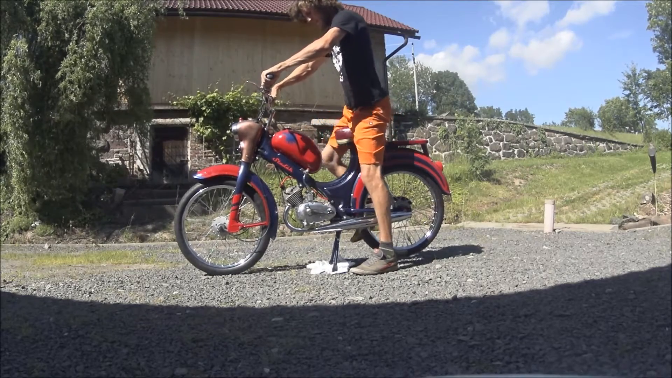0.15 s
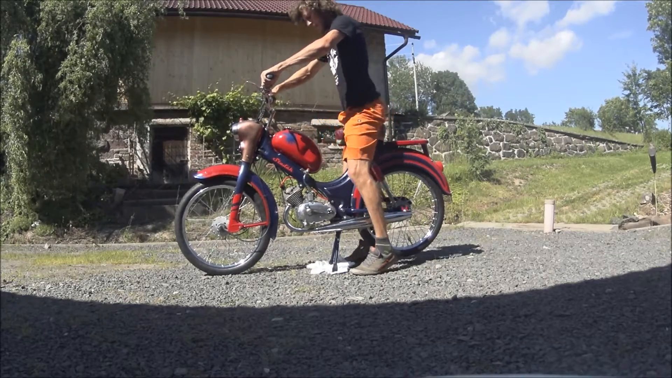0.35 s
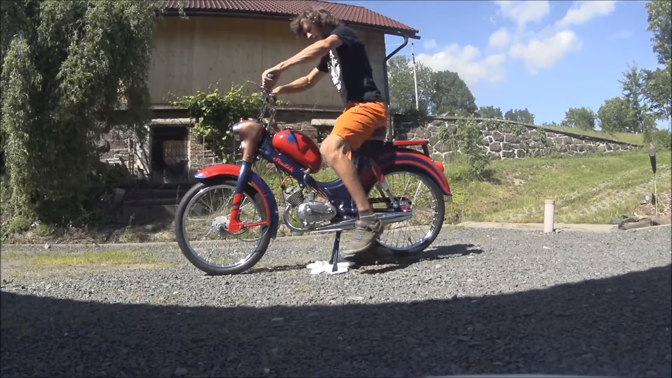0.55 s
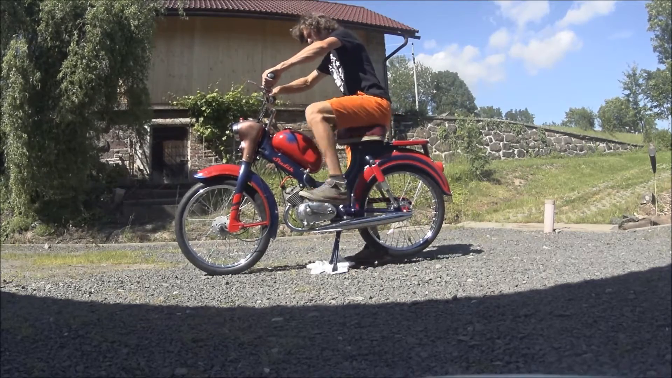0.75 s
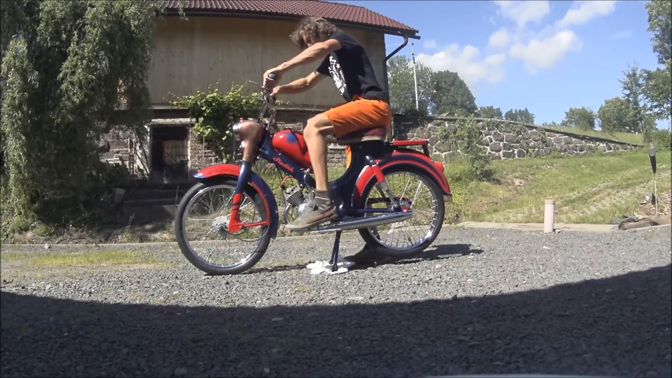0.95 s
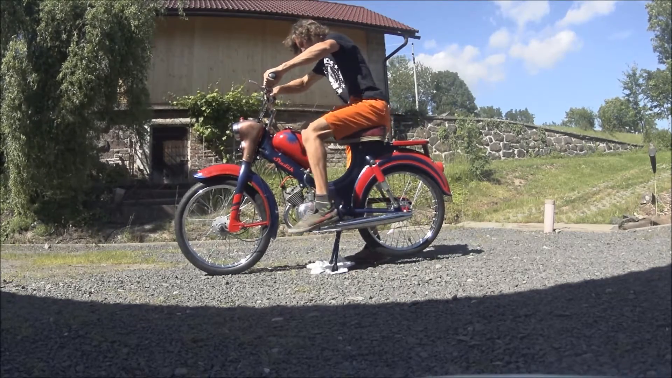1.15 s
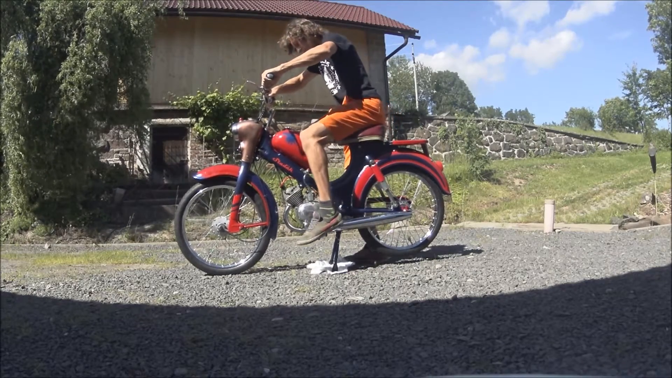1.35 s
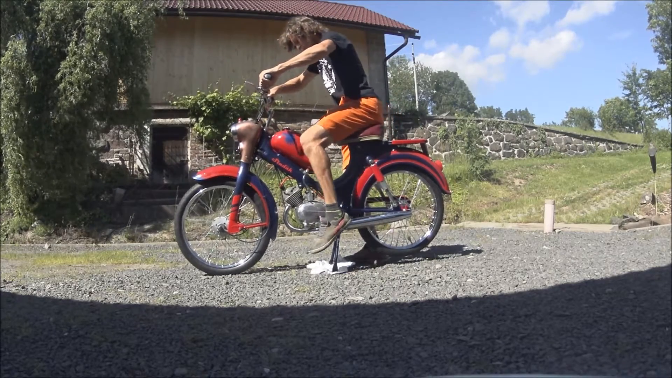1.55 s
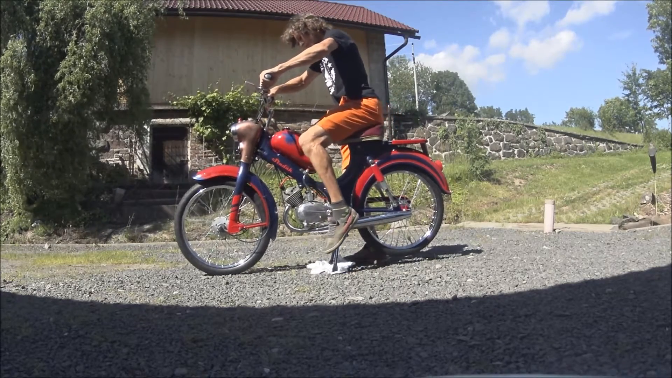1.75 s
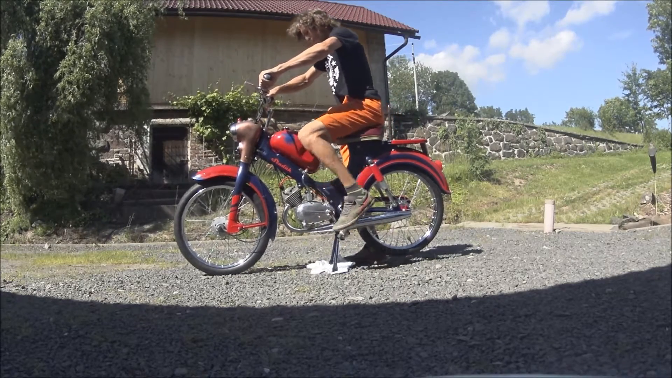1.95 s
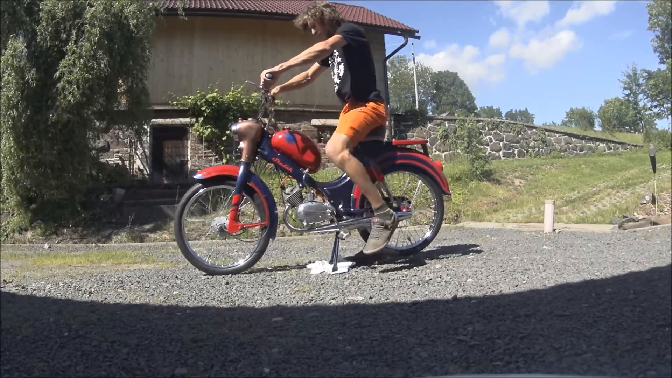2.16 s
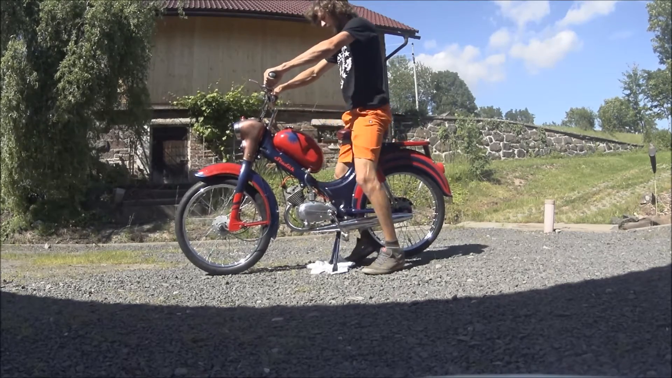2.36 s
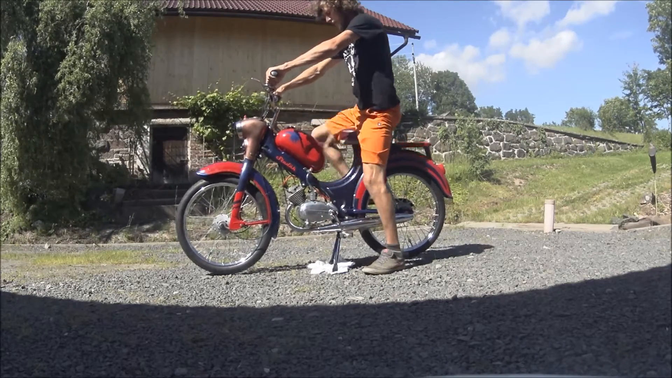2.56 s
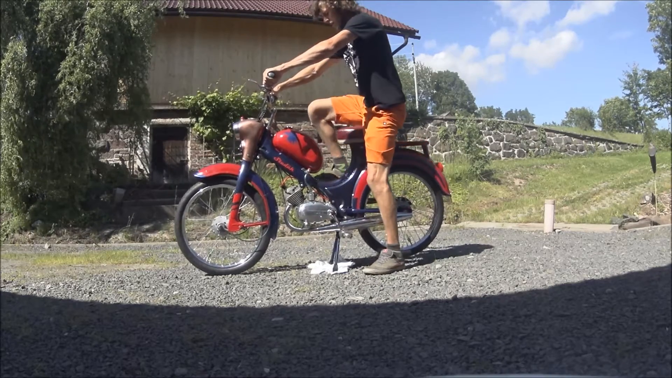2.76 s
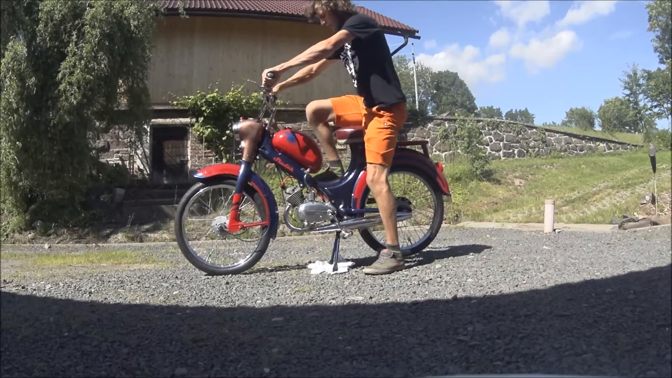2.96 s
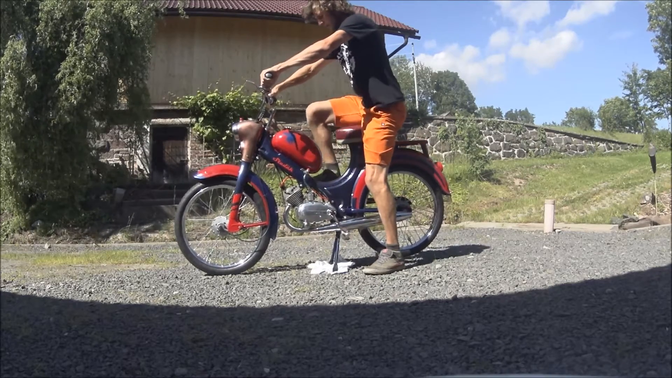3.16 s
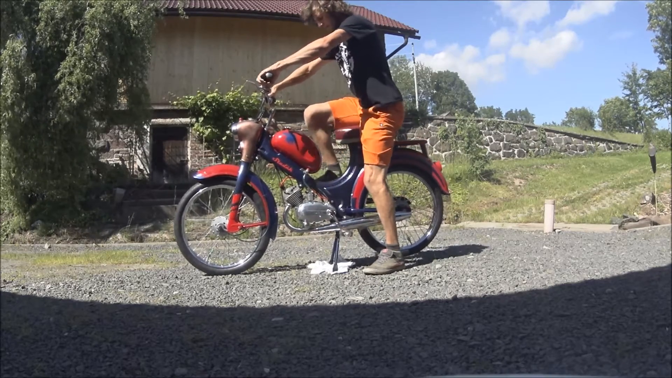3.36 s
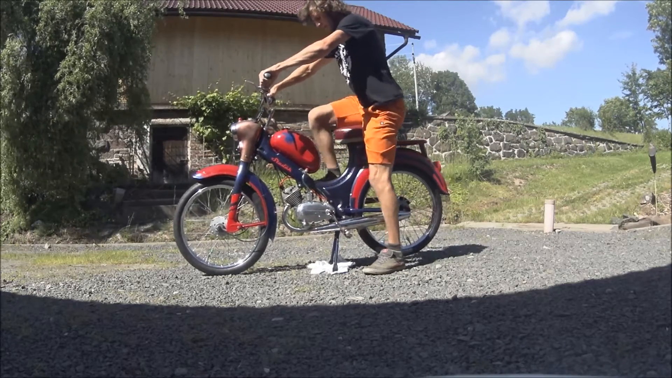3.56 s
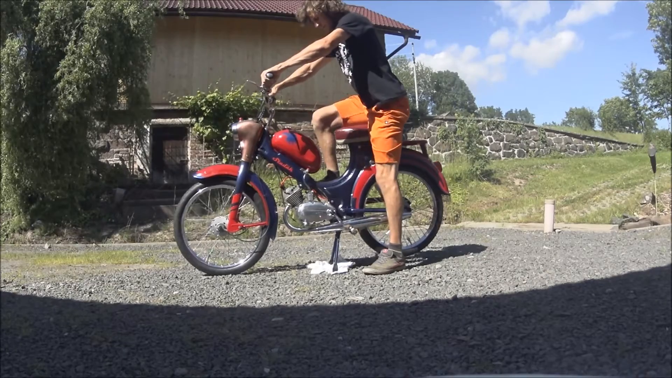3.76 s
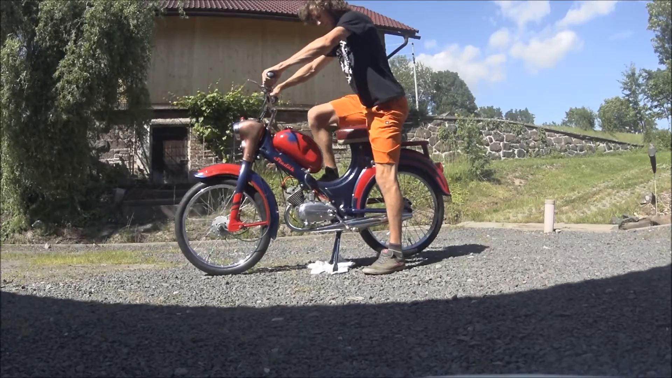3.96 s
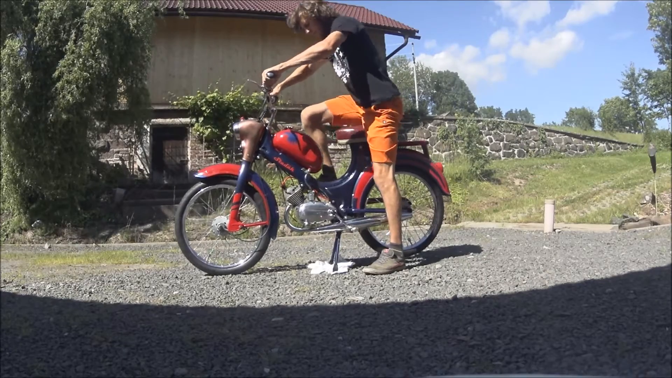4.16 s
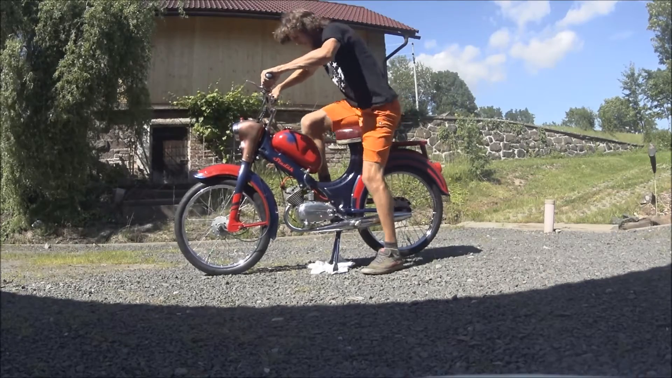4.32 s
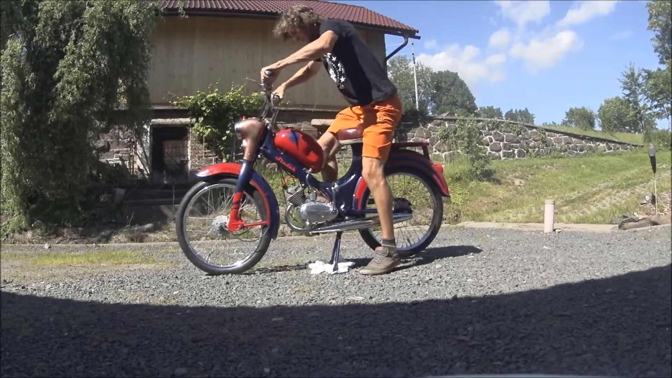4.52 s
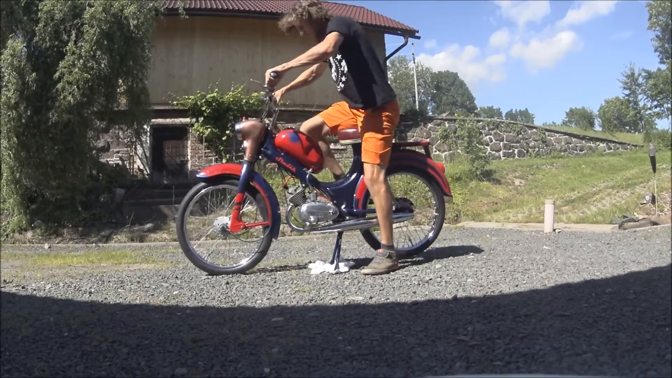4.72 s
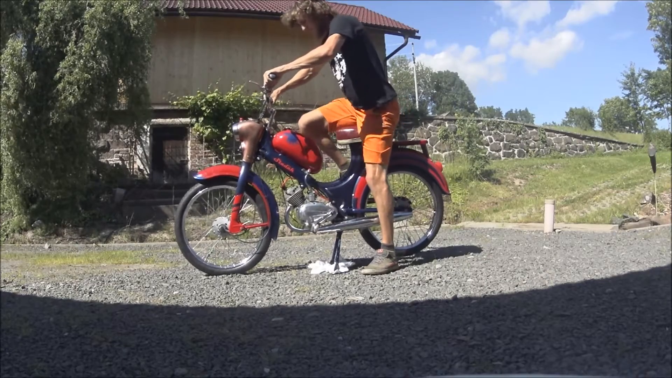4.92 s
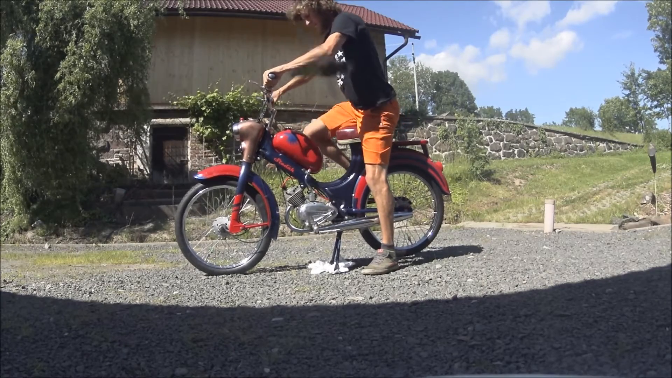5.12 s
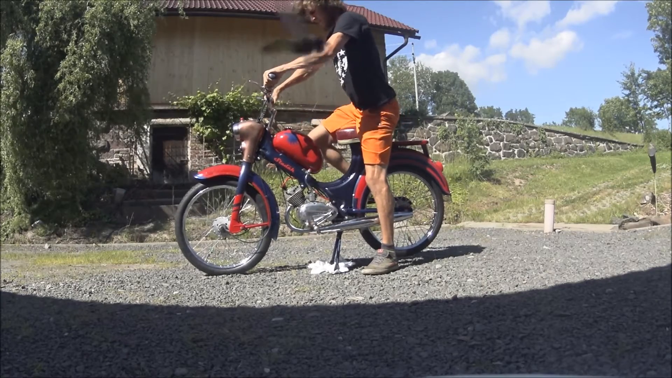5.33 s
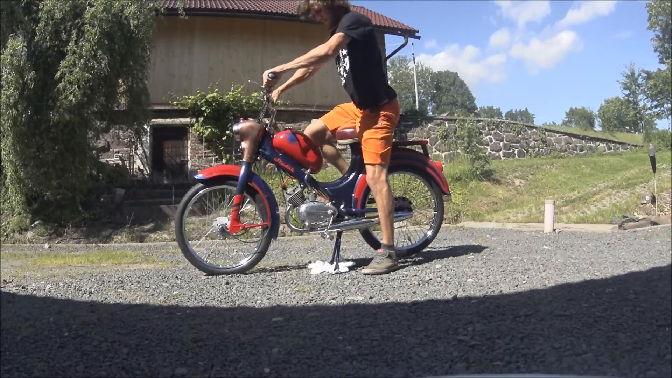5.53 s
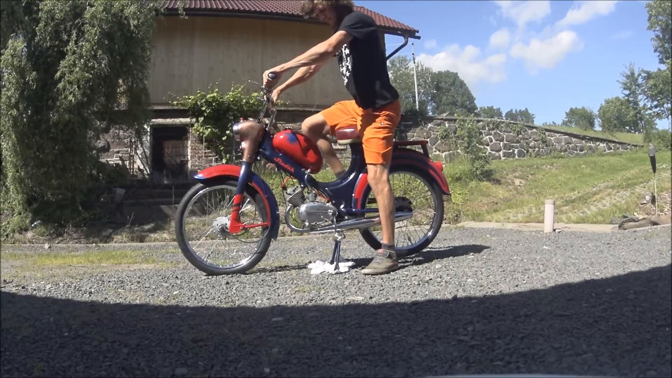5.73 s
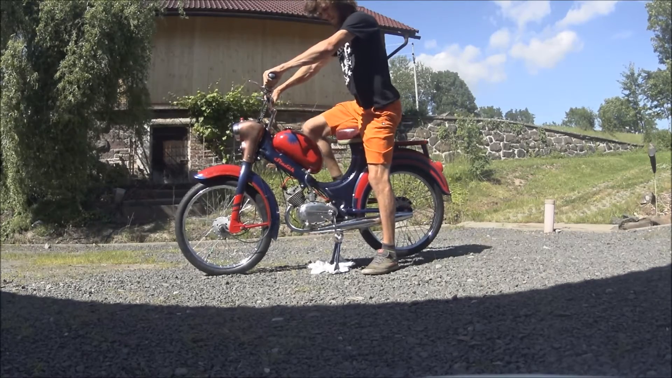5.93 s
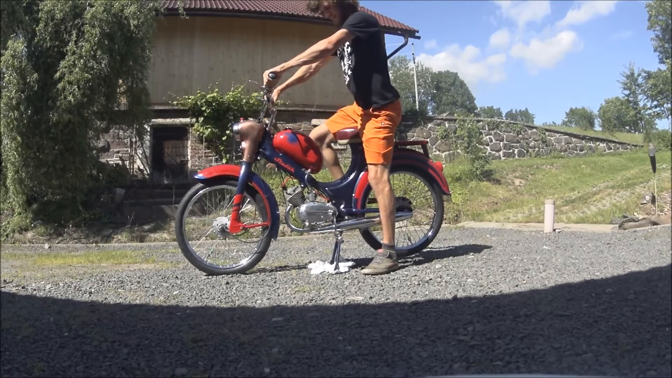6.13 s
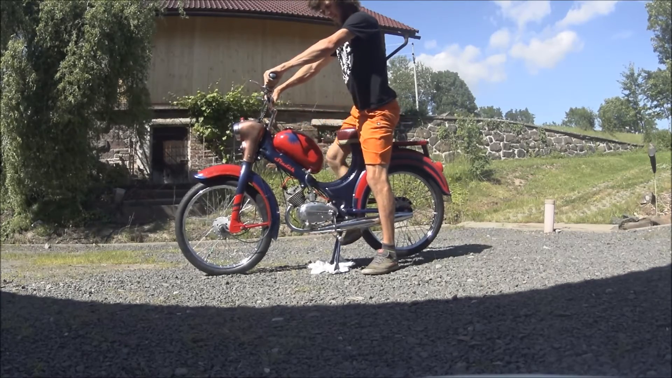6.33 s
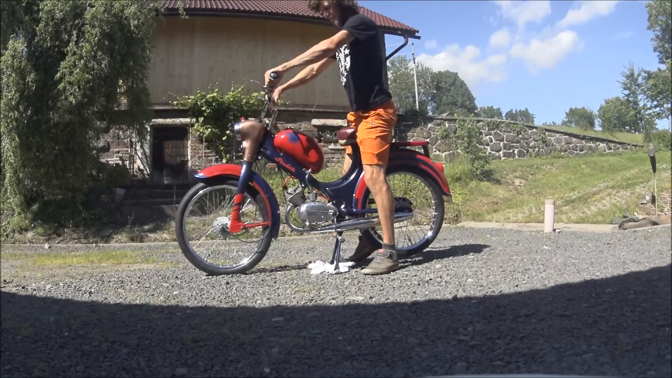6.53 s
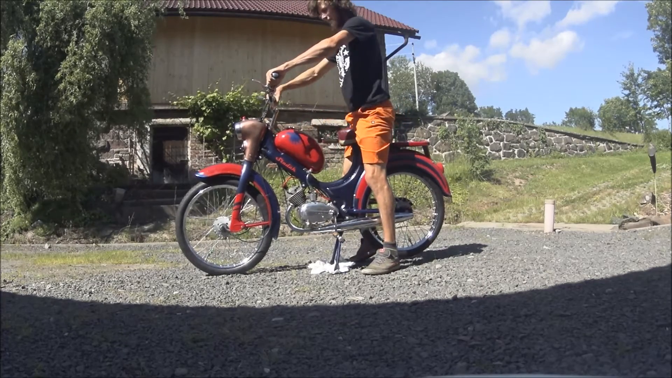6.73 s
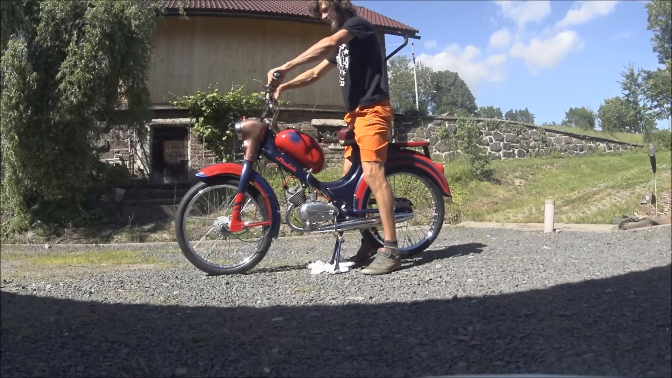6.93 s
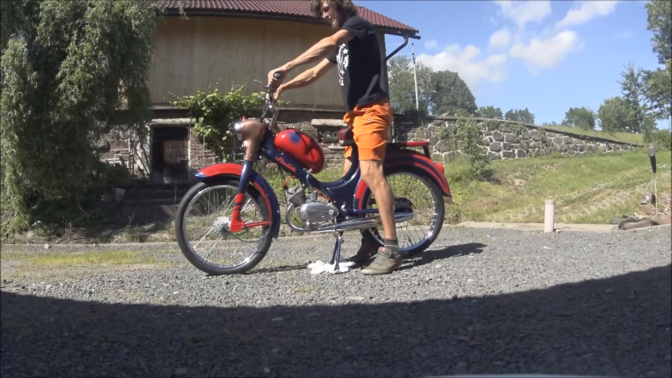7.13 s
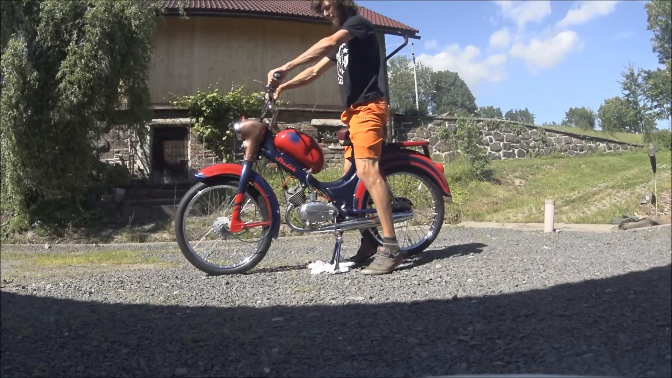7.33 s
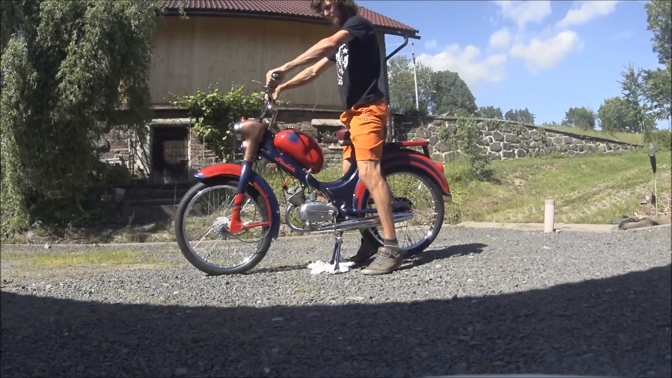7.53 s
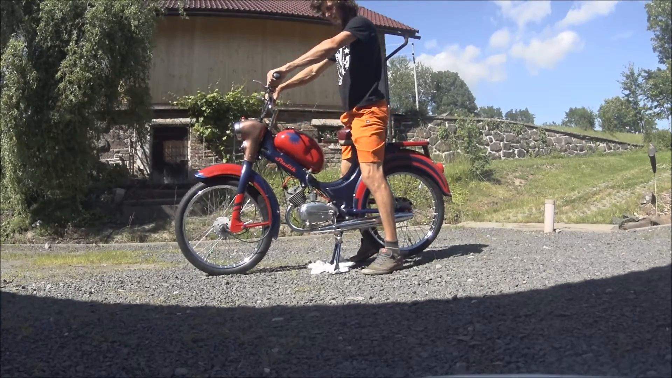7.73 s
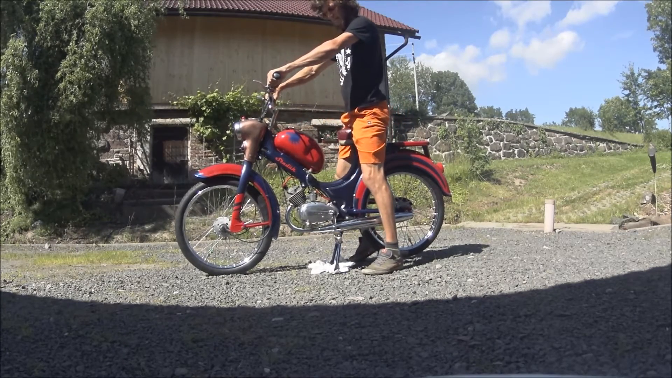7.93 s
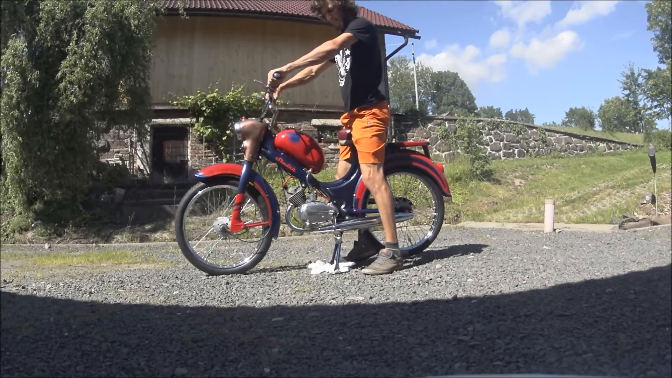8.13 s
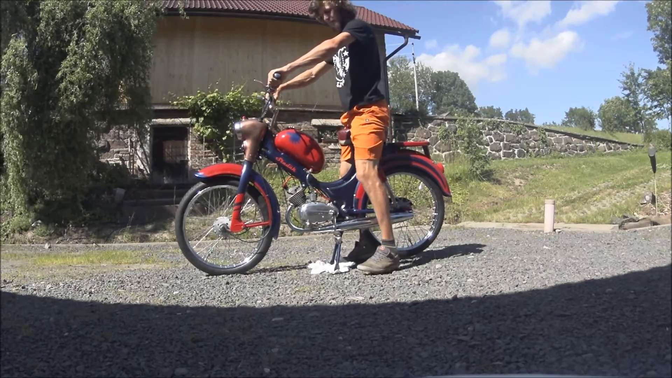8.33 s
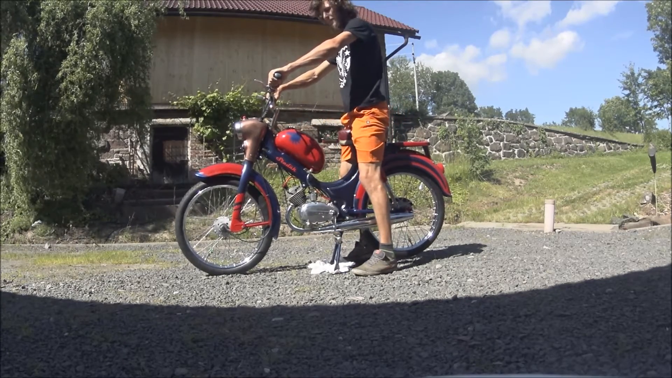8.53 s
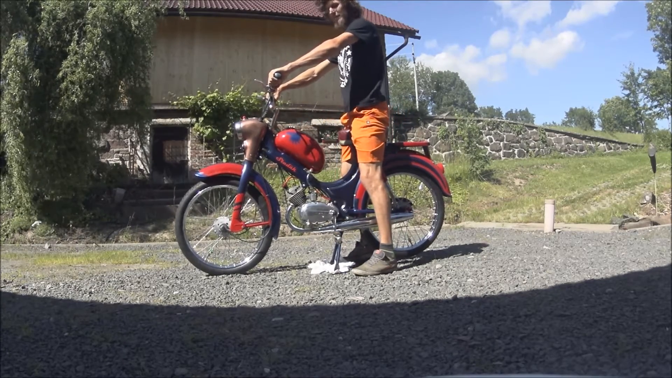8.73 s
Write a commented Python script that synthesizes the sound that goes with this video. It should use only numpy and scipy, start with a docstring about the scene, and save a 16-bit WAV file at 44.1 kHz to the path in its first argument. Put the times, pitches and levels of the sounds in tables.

```python
"""Shoes scuff gravel under a faint outdoor hush while a starter lever clacks; then a two-stroke moped is kicked
over, and each compression hisses out at the cylinder head. On the second kick it spins up and idles, firing
about every fourth turn with a sharp double spit over putter and clatter. One crank times the engine's pulses
and noise bursts; minimum-phase filters give each source its spectrum, and the yard and a barn wall answer."""
import sys
import numpy as np
from scipy import signal
from scipy.fft import rfft, irfft
from scipy.io import wavfile
from scipy.ndimage import uniform_filter1d

SR = 44100
rng = np.random.default_rng(int(sys.argv[2]) if len(sys.argv) > 2 else 0)


def waveform_to_disk(signal):
    """Save audio, clipped to [-1, 1], as 16-bit WAV at the path in sys.argv[1]."""
    frames = np.transpose(np.atleast_2d(signal))
    scaled = np.clip(frames, -1, 1) * 32767
    samples = np.round(scaled).astype(np.int16)
    wavfile.write(sys.argv[1], SR, samples)


N = 387198
TIME = np.arange(N) / SR

# Shoes scuffing the gravel: (middle time [s], relative level [dB], length [s])
SCUFFS = [(0.607, -59, 0.49), (2.555, -54, 1.08)]
# Spectra of gravel and outdoor hush: (frequency [Hz], relative density [dB])
GRAVEL_SPECTRUM = [(590, -47), (1000, -11), (2680, 6), (8750, -2), (16000, -9)]
HUSH_SPECTRUM = [(26, -34), (45, -6), (432, -13.5), (4240, -16.5), (16000, -31)]

# Knocks of the starter lever and its ratchet: (time [s], relative level [dB], treble against it [dB])
LEVER_KNOCKS = [(0.5188, -35.5, -8), (0.589, -40, -28), (0.8016, -32, -7.5), (1.0197, -38.5, -31),
                (2.223, -34, -11), (2.318, -34.5, -1.5), (2.336, -31, -2), (2.5092, -34, -19),
                (2.8913, -33, -32), (3.1134, -27, -11), (3.165, -37.5, -22), (3.2675, -37.5, -9.5),
                (3.3628, -26, -29), (3.41, -39, -28), (4.2608, -25.5, -6), (4.302, -34, -9),
                (4.314, -29, -11), (4.334, -29, -13), (4.41, -31, -23), (4.443, -25, -21)]
# Kick-starter gear, driven by the foot: (time [s], level [dB])
GEAR_LEVEL = [(4.279, -70), (4.31, -41), (4.38, -47), (4.45, -47), (4.53, -31), (4.62, -33.5), (4.78, -60)]
# Spectra of lever and gear: (frequency [Hz], relative density [dB])
LEVER_SPECTRUM = [(290, -50), (500, -4.5), (974, -24.5), (2200, 6.5), (4400, 8.5), (10200, -14.5),
                  (14900, -48)]
GEAR_SPECTRUM = [(410, -40), (958, -39), (1250, -21.5), (2700, -6.5), (4380, -18), (14600, -29.5)]

# Compression strokes without ignition: (middle time [s], relative level [dB], length [s])
COLD_STROKES = [(1.314, -17.5, 0.062), (1.442, -14, 0.052), (1.542, -14.5, 0.049), (1.655, -14.5, 0.046),
                (1.777, -15, 0.058), (1.931, -18.5, 0.068), (3.772, -22.5, 0.069)]
# Spectrum of their air jet: (frequency [Hz], relative density [dB])
JET_SPECTRUM = [(700, -66), (1100, -38), (3450, -1), (4600, -4), (6250, -1.5), (10400, -5), (13100, -2.5),
                (14900, -0.5), (16000, 7.5)]

# Crank speed, spun up by the kick, sagging, then picked up by the first firings: (time [s], speed [turns/s])
CRANK_SPEED = [(4.28, 9.26), (4.42, 14.77), (4.493, 42.08), (4.604, 59.15), (4.732, 44.28), (4.827, 30.11),
               (4.914, 39.64), (5.013, 40.36), (5.157, 45.72), (5.281, 51.16), (5.379, 51.69),
               (5.497, 42.75), (5.742, 46.26), (6.053, 48.72), (6.237, 48.65), (6.469, 51.85),
               (6.881, 51.08), (7.458, 54.2), (7.804, 56.82), (8.234, 51.87), (8.78, 52.5)]
# Stumbles, the next charge lighting early or late: (time of the firing before [s], turns until the next [turns])
STUMBLES = [(4.83, 5), (5.15, 3), (5.21, 3), (5.27, 6), (5.39, 5), (6.66, 3), (8.06, 3)]
# Running engine, rising with the kick, then a little as it warms:
# (time [s], relative exhaust level [dB], relative clatter level [dB])
RUNNING_LEVELS = [(4.41, -53, -52), (4.46, -40.5, -41), (4.56, -43.5, -38.5), (4.76, -42, -42),
                  (5.3, -43, -37), (6.72, -40, -34.5), (8.4, -41, -36)]
# Exhaust beat, one entry per turn since the last firing, from 0: (level [dB])
BEAT_LEVELS = [0.67, 12.7, 13.9, 16]
# Spectra of exhaust pipe and silencer's sheet-metal shell: (frequency [Hz], relative density [dB])
PIPE_SPECTRUM = [(30, -22), (66, -11), (100, -1), (160, 2), (330, 5), (430, -5), (650, -17), (900, -17),
                 (1500, -67.5)]
SHELL_SPECTRUM = [(150, -32), (400, -2), (510, -9), (600, 2), (800, -13), (1200, -37.5)]
# Resonances of pipe and shell: (frequency [Hz], width [Hz], rise above the spectrum [dB])
PIPE_MODES = [(100.7, 10, 8.7), (179, 8.7, 5.9), (387.6, 16, 10.5)]
SHELL_MODES = [(448.6, 18, 22.7), (566.2, 31, 18.6), (632.4, 26, 14.4)]

# Engine case spectrum: (frequency [Hz], relative density [dB])
CASE_SPECTRUM = [(300, -24.5), (600, -10), (800, -17), (1020, -28.5), (1350, -11), (1800, -11.5),
                 (2300, -9), (2900, -2.5), (4100, -4.5), (7000, -11.5), (10000, -12), (15500, -24.5)]
# Engine case resonances: (frequency [Hz], width [Hz], rise above the spectrum [dB])
CASE_MODES = [(1712, 38, 10.5), (1810, 59, 11.9), (1990, 165, 12.9), (2755, 450, 9.9), (3325, 87, 6.7),
              (4930, 210, 6.4)]

# Throttle, held open for the start, eased back, then opened a little again towards the end: (time [s], intake
# against exhaust [dB])
THROTTLE = [(4.7, -9), (4.85, -3), (5.1, -4), (5.3, -6), (5.58, -3), (6.3, -8.5), (7.5, -13), (7.85, -11),
            (8.15, -10)]
# Intake box spectrum: (frequency [Hz], relative density [dB])
AIRBOX_SPECTRUM = [(60, -38), (112, -11.5), (160, 5), (215, -14.5), (320, 8), (390, 1), (480, -11.5),
                   (800, -27.5), (1500, -56)]

# A cold charge lights late: (time [s], delay [s], change of the first spit [dB])
WARMING = [(4.83, .003, -8), (4.97, 0, -3), (6, 0, 0)]
# Spit spectrum: (frequency [Hz], relative density [dB])
SPIT_SPECTRUM = [(600, -32), (1300, -37.5), (2000, -9.5), (2600, 11), (4300, -2), (6500, -3), (9000, 0.5),
                 (11500, 3)]
# Cylinder head resonances: (frequency [Hz], width [Hz], rise above the spectrum [dB])
HEAD_MODES = [(2852, 230, 9.5), (3680, 157, 14), (5000, 450, 13.5), (6025, 610, 18), (7300, 390, 17.5),
              (10420, 100, 16)]

# Reverberation of the yard: (frequency [Hz], time to fall 60 dB [s])
YARD_T60 = [(1000, 0.94), (3000, 0.43), (8000, 0.35), (15000, 0.073)]
# The microphone pair: (frequency [Hz], side against mid [dB])
STEREO_WIDTH = [(100, -28), (400, -17), (650, -3), (1000, -18), (3000, -14), (5000, -9), (10000, -10),
                (13000, -5)]


def amp(db):
    """Level law: decibels to amplitude gain."""
    return 10 ** (np.asarray(db) / 20)


def evened(x):
    """Power normalisation: scaled to rms 1."""
    return x / np.sqrt(np.mean(x ** 2) + 1e-20)


def read(points, hz):
    """Interpolation of a table along a log-frequency axis."""
    f, value = np.transpose(points)
    return np.interp(np.log(hz + 1), np.log(f + 1), value)


def level(rows, axis=1):
    """Amplitude envelope from a dB column, at -120 dB before the first row."""
    rows = np.array(rows)
    return amp(np.interp(TIME, rows[:, 0], rows[:, axis], left=-120))


def add(mix, s, sound):
    """Linear superposition: mixes a sound in at time s [s]."""
    part = mix[max(round(s * SR), 0):][:len(sound)]
    part += sound[:len(part)]


def colour(x, spectrum, modes=(), size=8192):
    """Minimum-phase filter of unit energy: a broad spectrum with resonances on top."""
    hz = abs(np.fft.fftfreq(size, 1 / SR))
    db = read(spectrum, hz)
    for f, width, rise in modes:
        db = db + rise / (1 + (2 * (hz - f) / width) ** 2)
    # the Hilbert transform of log magnitude gives the phase of a causal response
    response = np.exp(np.conj(signal.hilbert(np.log(amp(db)))))
    ring = np.fft.ifft(response).real[:size // 2]
    return signal.oaconvolve(x, ring / np.linalg.norm(ring))[:N]


def burst(rise, decay):
    """Transient noise that swells over rise [s] and decays exponentially with time constant decay [s]."""
    t = np.arange(SR // 8) / SR
    envelope = np.minimum(t / rise, 1) * np.exp(-np.maximum(t - rise, 0) / decay)
    return rng.standard_normal(len(t)) * envelope


def grains(per_s, spread_db):
    """Random impulse train: sparse clicks, most small and a few large."""
    size = amp(spread_db * np.minimum(rng.exponential(1, N), 4))
    return evened(size * rng.choice([-1, 1], N) * (rng.random(N) < per_s / SR))


def outdoors(hush_db=-59.5, gravel_db=-2):
    """Granular friction: stones click at random under each swelling scuff, over steady broadband hush."""
    hush = amp(hush_db) * colour(rng.standard_normal(N), HUSH_SPECTRUM)
    weight = np.zeros(N)
    for s, db, length in SCUFFS:
        weight += amp(db) * np.cos(np.pi * np.clip((TIME - s) / length, -.5, .5))
    return hush + amp(gravel_db) * colour(grains(700, 2.6) * weight, GRAVEL_SPECTRUM)


def starter(knock_db=-8, tick_db=4, thud_db=-33, push_db=-47, bounce_db=-8, slack_db=-12,
            slack_s=0.0095, decay_s=0.0081):
    """Impact excitation: the lever takes up slack, knocks, bounces and shakes the frame; its driven gear rasps."""
    knocks, ticks, thuds = np.zeros((3, N))
    bounce_times = rng.uniform(1, 4, (len(LEVER_KNOCKS), 2))  # in decay times
    for (s, db, treble), bounces in zip(LEVER_KNOCKS, bounce_times):
        knock_level = db + knock_db
        add(knocks, s, amp(knock_level) * burst(0.00045, decay_s))
        add(knocks, s - slack_s, amp(knock_level + slack_db) * burst(0.001, decay_s / 2))
        for later in bounces:
            add(knocks, s + later * decay_s, amp(knock_level + bounce_db) * burst(0.0019, decay_s / 2))
        add(ticks, s, amp(db + treble + tick_db) * burst(0.00041, decay_s / 2))
        add(thuds, s, amp(db + thud_db) * burst(0.005, 0.11))
    # the foot's weight comes down on the stand
    add(thuds, GEAR_LEVEL[0][0], amp(push_db) * burst(0.053, 0.061))
    lever = colour(knocks, LEVER_SPECTRUM, [(2925, 120, 7.5)])
    treble_ring = colour(ticks, [(3000, -16.0), (7000, 4.5), (11000, -2), (16000, -1.5)])
    frame = colour(thuds, [(40, -31), (130, 7.5), (300, -3), (800, -19.5), (2000, -58)])
    gear = colour(grains(900, 2.2) * level(GEAR_LEVEL), GEAR_SPECTRUM)
    return lever + treble_ring + frame + gear


def compression(tops, running_db=-29.5, running_turn=0.78, flutter=0.21, rise_per_db=0.01, smooth=60):
    """Jet noise: air squeezed past the head swells and fades with each stroke, fluttering on the cold ones."""
    strokes, swell = np.zeros((2, N))
    jet = [(2780, 510, 5.4), (3780, 760, 5.7), (6150, 470, 4.3), (10510, 500, 14.6)]
    for s, db, length in COLD_STROKES:
        count = int(length * SR)
        air = np.hanning(count) * rng.standard_normal(count)
        air *= 1 + flutter * evened(uniform_filter1d(rng.standard_normal(SR), smooth))[:count]
        # a slow push builds less pressure, so its jet is duller
        dull = np.interp(db, [-25, -21], [.85, 0])
        # resonances sit higher the weaker the stroke is against the first
        shift = 1 + rise_per_db * (COLD_STROKES[0][1] - db)
        modes = [(f * shift, width, rise) for f, width, rise in jet] + [(3540, 2000, 12 * dull)]
        add(strokes, s - length / 2, amp(db) * colour(air, JET_SPECTRUM, modes))
    # on the turning crank each swell is a share of a turn, at most 28 ms, centred 2 ms before top
    for s, length in zip(tops, np.minimum(running_turn * np.gradient(tops), .028)):
        add(swell, s - .002 - length / 2, np.hanning(int(length * SR)))
    leak = [(1200, -32), (2300, 3), (3100, 11), (4300, -9.5), (7000, -1.5), (10000, -6.5), (15500, -3.5)]
    running = colour(swell * rng.standard_normal(N), leak, [(10300, 290, 4.3)])
    return strokes + amp(running_db) * running


def exhaust(tops, since, port_turn=0.377, uneven_db=1.8, gain_db=-3.0, shell_db=-13,
            coast_db=-33.5, coast_delay=0.041):
    """Pulsed flow: the port opens once a turn, driving the pipe's resonances and ringing the silencer shell."""
    pulses, rush, sighs = np.zeros((3, N))
    # while the crank coasts, unburnt charge leaves with a soft thud; the last two strokes give none
    for s, db, _ in COLD_STROKES[:-2]:
        add(sighs, s + coast_delay, amp(db + coast_db) * burst(.004, .04))
    opens = tops[:-1] + port_turn * np.diff(tops)
    beat_db = np.take(BEAT_LEVELS, since[:-1], mode="clip")
    heights = amp(beat_db + uneven_db * rng.standard_normal(len(opens)))
    for s, height in zip(opens, heights):
        add(pulses, s, height * np.ones(1))
        add(rush, s, height * burst(0.0035, 0.014))
    # clean pulses of cold air at first, more turbulence once the engine burns steadily
    turbulence = np.interp(TIME, [5, 6.8], [.01, .1])  # share of power
    flow = np.sqrt(1 - turbulence) * evened(pulses) + np.sqrt(turbulence) * evened(rush)
    flow *= level(RUNNING_LEVELS)
    # the cold pipe answers broadly; its narrow resonances come in with the hot gas
    warm = np.clip((TIME - 5.1) / .3, 0, 1)
    hot_gas = colour(flow * warm, PIPE_SPECTRUM, PIPE_MODES)
    cold_gas = colour(flow * (1 - warm), PIPE_SPECTRUM, [(153, 30, 5.4)])
    shell = colour(flow, SHELL_SPECTRUM, SHELL_MODES)
    coasting = colour(sighs, [(60, -23), (140, 0), (380, -13), (900, -27.5)])
    return amp(gain_db) * (hot_gas + cold_gas) + amp(shell_db) * shell + coasting


def crank(surge=.05, first_firing_s=4.831, turns_per_firing=4):
    """Phase integration of speed: times of top dead centre [s], and turns since firing (0 where a charge lights)."""
    turns = np.cumsum(np.interp(TIME, *np.transpose(CRANK_SPEED), left=0)) / SR
    fired = np.interp(first_firing_s, TIME, turns)
    tops = list(np.arange(fired % 1, fired - .5))
    since = [2] * len(tops)  # turns before the first firing beat like the second after one
    while fired < turns[-1]:
        s = np.interp(fired, turns, TIME)
        # at idle the cylinder needs four turns to clear before a charge lights again
        count = next((gap for at, gap in STUMBLES if abs(at - s) < .025), turns_per_firing)
        part = np.arange(count) / count
        tops += list(fired + count * (part - surge * part * (1 - part)))  # quick after the bang, then slowing
        since += range(count)
        fired += count
    return np.interp(tops, turns, TIME), np.array(since)


def clatter(tops, slap_decay=0.012, uneven_db=1.5, rattle_db=2, whirr_db=0.5):
    """Structure-borne sound: piston slap each turn, loose gear teeth and a steady whirr ring the engine case."""
    slaps = np.zeros(N)
    for s, chance in zip(tops, rng.standard_normal(len(tops))):
        add(slaps, s - .002, amp(uneven_db * chance) * burst(0.00054, slap_decay))
    rattle = amp(rattle_db) * grains(900, 0.67)
    whirr = amp(whirr_db) * rng.standard_normal(N)
    drive = evened(slaps) + rattle + whirr
    return colour(drive * level(RUNNING_LEVELS, axis=2), CASE_SPECTRUM, CASE_MODES)


def intake(tops, port_turn=0.8654):
    """Periodic suction: the carburettor gulps once a turn, hardest while the throttle is open for the start."""
    gulps = np.zeros(N)
    for s in tops[:-1] + port_turn * np.diff(tops):
        add(gulps, s, np.ones(1))
    return colour(evened(gulps) * level(THROTTLE) * level(RUNNING_LEVELS), AIRBOX_SPECTRUM)


def spits(firings, first_db=-11.5, second_db=-11.2, tail_db=-18, crackle=.25, wander=.018, count=4):
    """Pressure release: each firing spits at ignition and at peak pressure, then a crackling hiss trails off."""
    cracks, hiss = np.zeros((count, N)), np.zeros(N)
    times, delays, first_changes = np.transpose(WARMING)
    chances = rng.standard_normal((len(firings), 3))
    gaps = rng.integers(0, count, len(firings))
    for s, (a, b, c), gap in zip(firings, chances, gaps):
        lit = s + np.interp(s, times, delays)
        pressure_peak = lit + .0058 + .0006 * c
        first_level = first_db + np.interp(s, times, first_changes) + .8 * a
        add(cracks[gap], lit - .0004, amp(first_level) * burst(.0014, .0022))
        add(cracks[gap], pressure_peak, amp(second_db + .8 * b) * burst(.0012, .0028))
        add(hiss, pressure_peak, amp(tail_db + 1.3 * b) * burst(.0045, .0135))
    flicker = evened(uniform_filter1d(rng.standard_normal(N), 25))
    hiss *= np.exp(crackle * flicker - crackle ** 2)
    # the gap it escapes through opens a little differently each time, shifting the spits' resonances
    head = np.zeros(N)
    for crack, shift in zip(cracks, 1 + wander * np.linspace(-1, 1, count)):
        head += colour(crack, SPIT_SPECTRUM, [(f * shift, width, rise) for f, width, rise in HEAD_MODES])
    bright = [(1000, -23.0), (2500, -3.5), (5000, -3.5), (8500, -2), (11500, -7.0)]
    return head + colour(hiss, bright, [(7850, 210, 7), (10350, 210, 9.9)])


def yard(x, wet_db=-16.5, wall_db=-29, wall_delay=.075):
    """Reverberation: diffuse scatter from ground and bushes, and one late reflection off the barn wall."""
    taps = rng.standard_normal(SR // 2) * (rng.random(SR // 2) < 3000 / SR)
    hz, t, z = signal.stft(taps, SR, nperseg=256)
    decay = amp(-60 * t / read(YARD_T60, hz)[:, None])
    onset = np.minimum(t / 0.034, 1)
    tail = signal.istft(z * decay * onset, SR, nperseg=256)[1]
    tail *= amp(wet_db) / np.linalg.norm(tail)
    add(tail, wall_delay, amp(wall_db) * np.ones(1))
    return signal.oaconvolve(x, tail)[:N]


def spread(x):
    """Decorrelation: close reflections reach the two microphone ports differently, mostly in the treble."""
    scatter = burst(.0002, .009)
    side = signal.oaconvolve(x, scatter / np.linalg.norm(scatter))[:N]
    width = amp(read(STEREO_WIDTH, np.fft.rfftfreq(N, 1 / SR)))
    side = irfft(rfft(side) * width, N)
    return np.array([x + side, x - side])


def scene():
    """Superposition: one crank drives the running engine; parts arrive by their own paths and the yard answers."""
    tops, since = crank()
    breath = exhaust(tops, since) + intake(tops)
    head = compression(tops) + starter()
    parts = [breath, clatter(tops), spits(tops[since == 0]), head]
    surroundings = yard(sum(parts)) + outdoors()
    return sum(spread(sound) for sound in [*parts, surroundings])


def record(dry, edge_hz=15750):
    """Band limiting: a linear-phase low-pass filter ends the treble at edge_hz."""
    lowpass = signal.firwin(511, edge_hz, window=("kaiser", 9), fs=SR)
    return signal.oaconvolve(dry, lowpass[None], "same")


dry = scene()
out = record(dry)
waveform_to_disk(out)
```